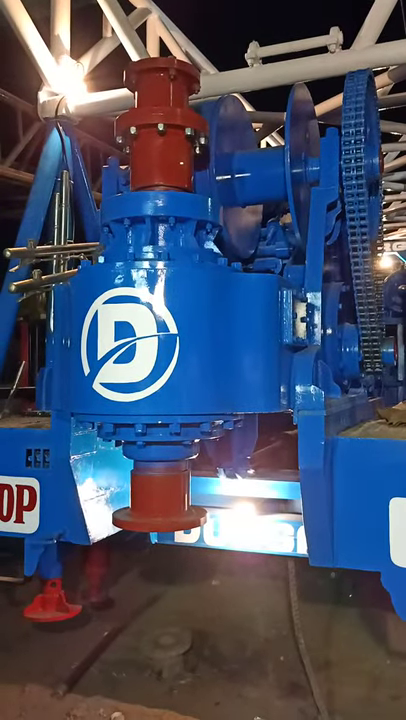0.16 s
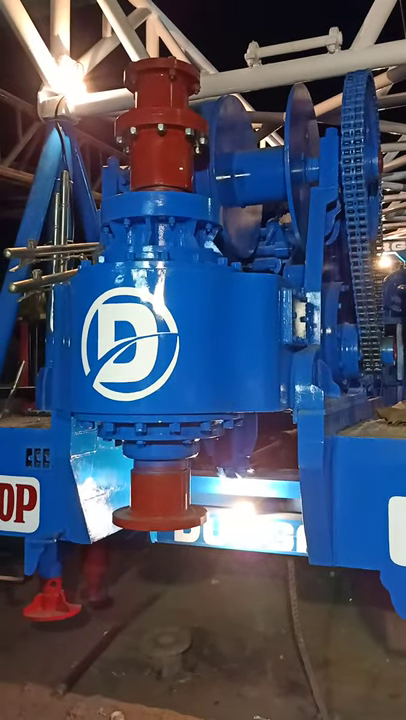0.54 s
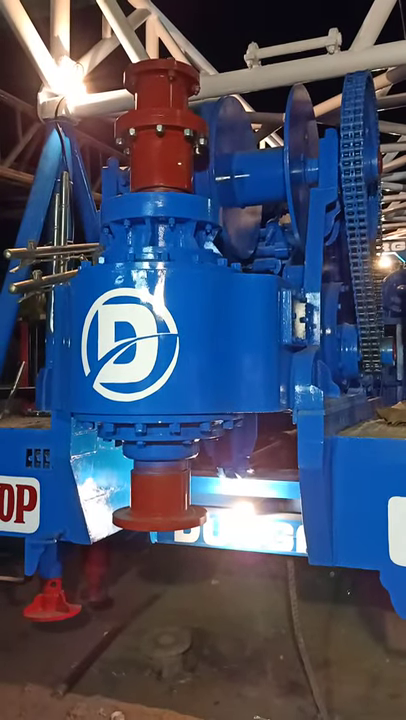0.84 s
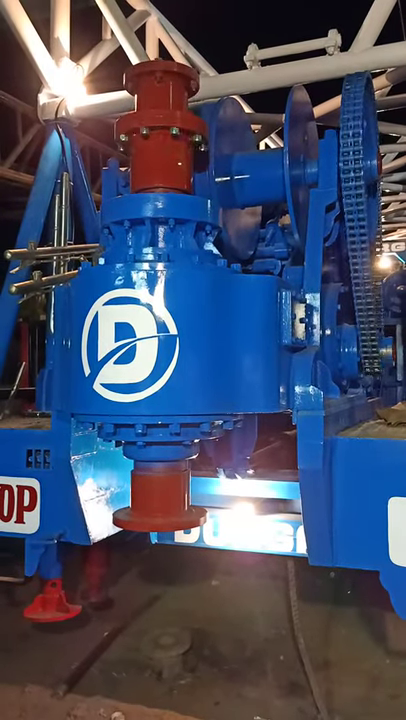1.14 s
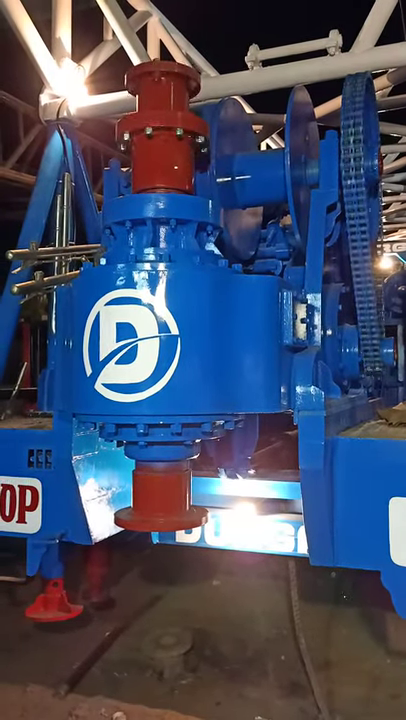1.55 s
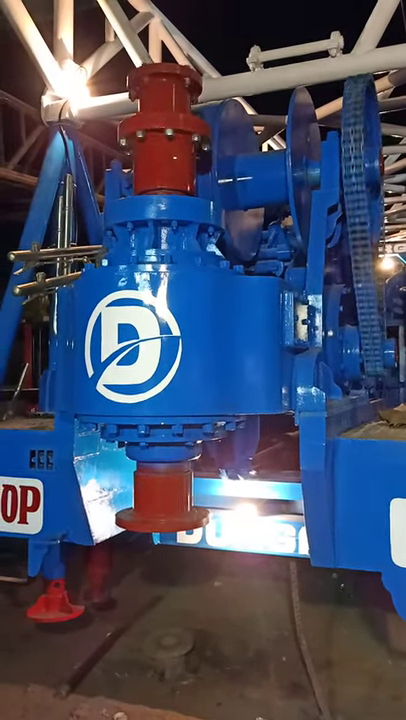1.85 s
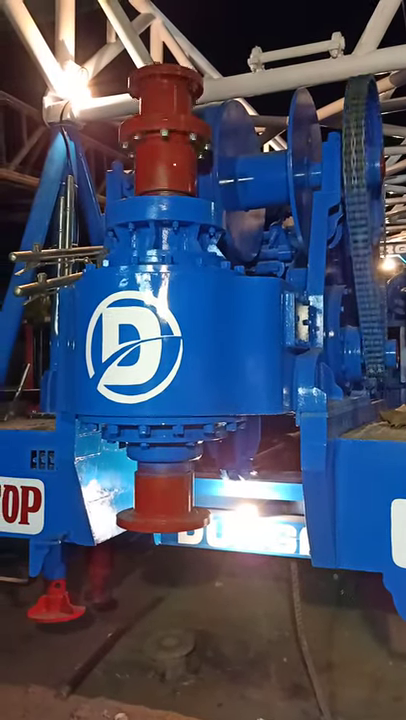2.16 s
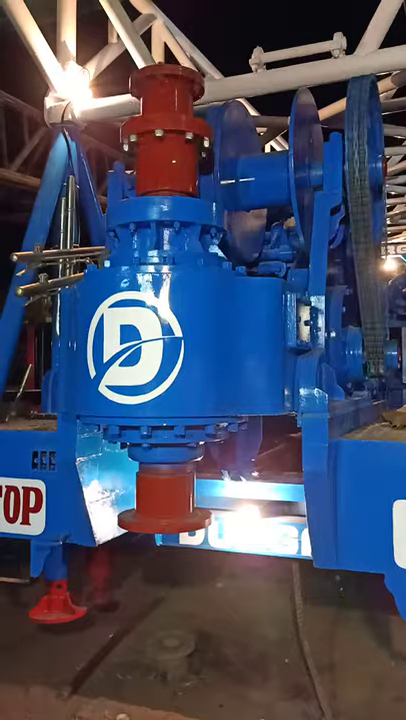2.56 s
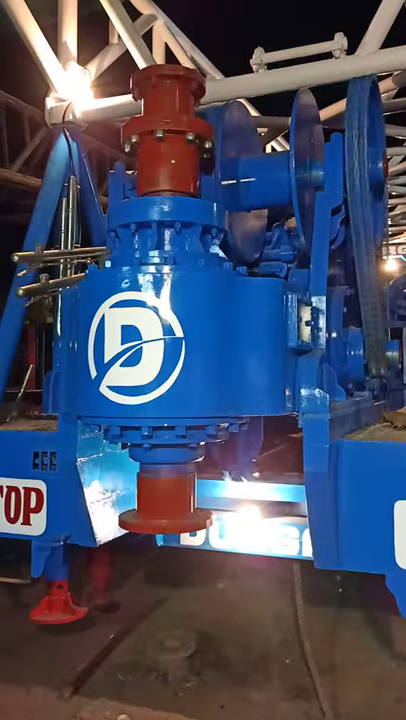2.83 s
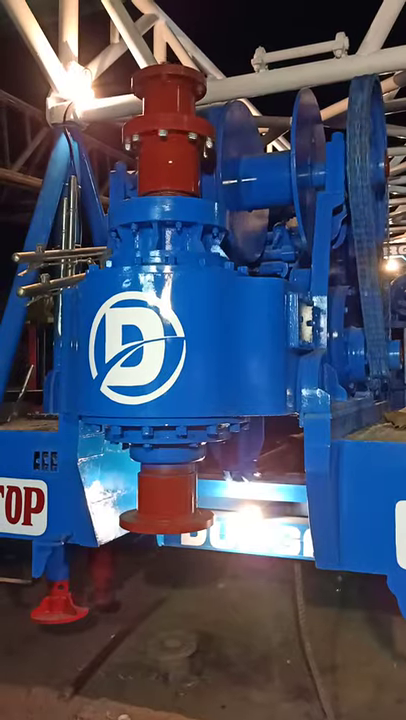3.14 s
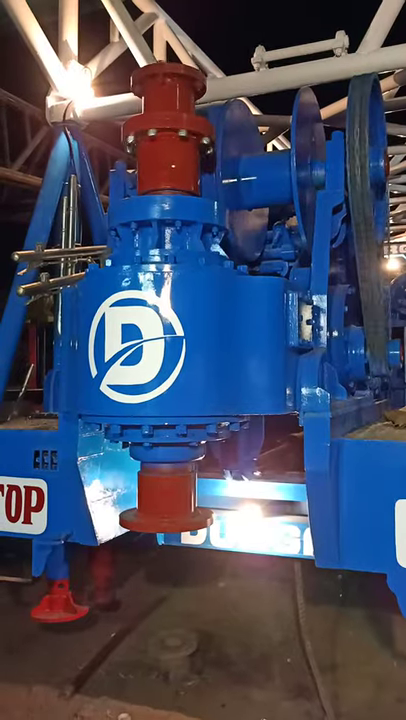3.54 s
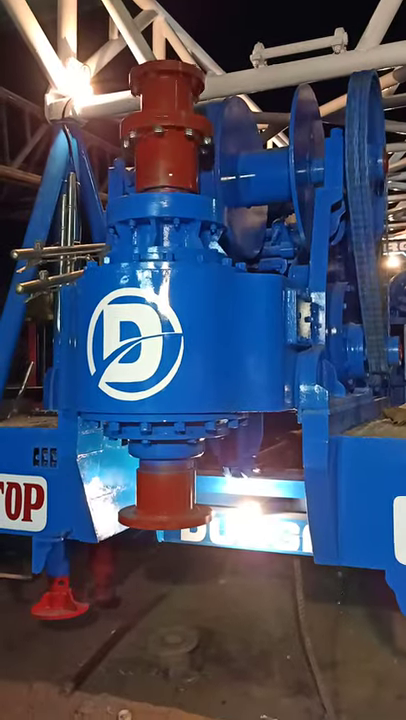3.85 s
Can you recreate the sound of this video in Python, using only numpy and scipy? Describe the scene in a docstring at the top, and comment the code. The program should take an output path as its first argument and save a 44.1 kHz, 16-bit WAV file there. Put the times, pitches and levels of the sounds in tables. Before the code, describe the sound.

A drilling rig heard close in stereo, outdoors. For the first second the engine idles as a low, humming rumble under a soft wash, with faint bright rattles of loose metal. From about 1 s it revs and a chain drive spins up, its rough growl rising in pitch and surging through steel frame resonances over a swelling, knocking roar. It peaks around 3.4 s, then eases slightly, still running at 4 s.

```python
"""A drilling rig heard close by, in stereo. At first the engine idles, as low firing tones under a wash of
shaped noise and wavering hums, while faint noise bursts of loose metal come and go in the treble.
From about 1 s the engine is revved and a chain drive spins up: its link blows, a harmonic series of rising
pitch, ring the resonances of the steel frame, over a growing roar of noise and irregular knocks.
Near the end the engine, chain and roar ease a little."""
import sys
import numpy as np
from scipy import signal
from scipy.fft import rfft, irfft
from scipy.io import wavfile
from scipy.ndimage import uniform_filter1d

SR = 44100
rng = np.random.default_rng(int(sys.argv[2]) if len(sys.argv) > 2 else 0)


def store_pcm(level_fs):
    """Save levels as 16-bit WAV."""
    pcm = np.round(np.clip(level_fs, -1, 1) * 32767).astype(np.int16)
    wavfile.write(sys.argv[1], SR, np.atleast_2d(pcm).T)


N = 176400  # samples: 4 s

# Spectrum of the idling wash. Each row: frequency in Hz, gain in dB.
IDLE_SPECTRUM = [(40, -19), (90, -12), (125, 1.5), (150, -5.5), (230, -2.5), (310, -2), (420, -3),
                 (620, -10), (800, -9), (1250, -8), (1650, -15), (2000, -11.5), (2700, -12.5), (3300, -26),
                 (4000, -31.5), (5500, -33.5), (7200, -34), (8000, -35), (10000, -40.5), (12200, -41.5),
                 (13500, -55), (14300, -42), (15400, -42)]
# Wavering hums of the idling machinery. Each row: frequency in Hz, bandwidth in Hz, level in dB.
IDLE_HUMS = [(148.3, 19, -42), (180.4, 16, -48.5), (318, 16, -48.5)]
IDLE_DB = -33.5  # of the wash

# Bursts of loose metal. Each row: start in seconds, nominal length in seconds, level in dB,
# ring frequency in Hz, left minus right in dB.
RATTLES = [(.085, .03, -61, 9000, 0), (0.179, 0.045, -55, 9000, -2), (.41, 0.047, -59, 9000, 0),
           (0.504, 0.081, -52.5, 9000, 0), (0.667, 0.051, -50.5, 9000, 0), (0.778, 0.057, -60, 9000, 0),
           (0.879, 0.053, -53, 9000, 0), (1.183, 0.042, -54, 9090, -9), (1.494, 0.033, -49.5, 6700, 3),
           (2.29, 0.052, -52, 8900, -3), (2.688, 0.011, -47, 6300, 2), (2.907, 0.0072, -47, 6420, -2),
           (2.938, 0.031, -44.5, 4800, 0), (3.033, 0.0063, -43, 7120, 4), (3.1, 0.023, -48, 6170, 0),
           (3.29, 0.013, -51, 6197, 0), (3.317, .04, -46, 9000, -3), (3.426, 0.017, -48, 6200, 0),
           (3.636, 0.042, -49, 6330, -3), (3.7, 0.023, -56, 5000, 2)]
# Spectrum of the bursts. Each row: frequency in Hz, gain in dB.
RATTLE_SPECTRUM = [(2500, -23), (4000, 4), (6500, 1), (9000, -2), (10500, -4), (12200, -7), (13500, -7),
                   (15500, -3)]
RATTLE_WIDTH_HZ, RATTLE_RING_DB = 1000, -6
HEAVY_HZ, HEAVY_RING_DB = 8000, 7  # parts that ring below this ring more strongly, by this much
RATTLE_RISE, RATTLE_FADE_DB = 0.35, 6  # rise as a share of the length; fade reached at the length
RATTLE_GRAIN_DB, RATTLE_GRAIN_HZ = 2.2, 120  # uneven ticks inside a burst

# Engine firing. Each row: time in seconds, firing frequency in Hz, level in dB.
FIRING = [(0, 49.7, -48), (.64, 50.62, -45.5), (1.15, 48.2, -55.5), (1.5, 50, -49), (2.0, 58.7, -51),
          (2.3, 64.16, -34.5), (2.42, 67.2, -38), (3.1, 68.2, -42.5), (3.5, 66.38, -48), (4, 62.8, -44)]
# Orders of the firing frequency. Each row: multiple, relative level in dB.
FIRING_ORDERS = [(1, -0.5), (2, 0.5), (3, 0), (4, -7), (6, 1)]

# Modes of the steel frame. Each row: frequency in Hz, bandwidth in Hz, gain in dB.
FRAME_MODES = [(133.6, 22, -3), (155, 20, -6), (193.3, 37.6, 0), (230, 57, -4), (248.6, 13, 2.5),
               (324, 49, 8), (360.6, 7.9, 6.5), (424, 32, 3), (470, 3.9, 5), (589.3, 30, 2.5),
               (728, 140, -7), (854, 17, -1), (983, 63, -11.5), (1700, 53, -6), (1855, 45, -2.5),
               (2350, 130, -9)]
FRAME_LOW_HZ = 85  # the frame radiates little below this

# Roar of the running drive. Each row: time in seconds, level in dB, extra level of its treble in dB.
ROAR = [(1.2, -34, 3), (1.4, -33, 2), (1.6, -31, -4), (1.8, -27.5, -8), (2.0, -25.5, -6.5),
        (2.2, -23, -3.5), (2.35, -22.5, -4.5), (2.55, -21.5, -4), (2.75, -21, -6), (2.92, -20, -6),
        (2.97, -19, -4.5), (3.15, -19.5, -4), (3.4, -18.5, -5), (3.55, -20, -5.5), (3.75, -23, -5),
        (4, -23, -5)]
# Spectrum of the roar's noise. Each row: frequency in Hz, gain in dB.
ROAR_SPECTRUM = [(40, -41), (90, -35), (125, -6), (200, -6), (300, -5), (440, -4), (520, -9.5), (600, -7.5),
                 (950, -11.5), (1450, -23), (1900, -21.5), (2400, -20.5), (2850, -26.5), (3400, -35),
                 (4000, -34), (5500, -37.5), (6200, -34), (7500, -38), (9200, -40), (10500, -45.5),
                 (12200, -48), (13500, -55), (14500, -48), (15500, -66)]
DRIVE_START_S, DRIVE_RISE_S = 0.99, 0.53
KNOCKS_PER_S, KNOCKS_DB = 1000, -3  # mean rate in each channel; level relative to the noise
KNOCK_SOFT_HZ = 2600  # blunt knocks hold little above this

# Speed of the chain. Each row: time in seconds, links per second.
CHAIN_SPEED = [(1.4, 42), (1.76, 60), (2.02, 80), (2.13, 85), (2.2, 93), (2.29, 99.5), (2.38, 99.5),
               (2.45, 105.6), (2.66, 116.8), (2.77, 120.4), (2.93, 127.6), (3.1, 135.5), (3.22, 142.5),
               (3.29, 143), (3.46, 149.5), (3.6, 156), (3.79, 153), (4, 149.5)]
# Link blows. Each row: time in seconds, force in dB, extra level of the third harmonic in dB,
# extra level of the harmonics above it in dB.
LINK_FORCE = [(1.4, -37, 3, 4), (1.6, -39.5, 6, 4.5), (1.76, -32.5, 6.5, -3), (1.92, -29, 0.5, -1),
              (2.02, -29, -3, 1.5), (2.13, -21.5, -9, -8), (2.2, -21.5, 0, -10.5), (2.29, -35, 7, 9.5),
              (2.37, -32.5, 8, 6), (2.44, -19, 1.5, -3), (2.51, -35.5, 7.5, 4), (2.56, -29, 1, 3),
              (2.65, -22, -2, -1), (2.77, -21, -1.5, 4.5), (2.85, -21.5, 0, -1), (2.93, -15, -4, -9),
              (2.99, -22, 1, 3), (3.1, -23.5, 1.5, -1.5), (3.2, -19, -18, -11), (3.29, -21.5, 8, 4),
              (3.38, -18.5, -8, -1), (3.46, -17.5, -14, -6), (3.6, -19, -17, -6.5), (3.75, -21, -9, -13.5),
              (3.89, -23.5, -2, -2.5), (4, -21.5, -18, -4)]
# Harmonics of one link's blow. Each row: multiple, level in dB.
BLOW_HARMONICS = [(1, -12), (2, -5.5), (3, -8), (4, -7.5), (5, -8.5), (6, -10)]
WAVER_DB, WAVER_HZ = 1.2, 12
STIFF_DB = -8  # response of the frame away from its modes
# The blows stray from time while the chain runs slow and slack.
SLACK_TURNS, SLACK_HZ, TAUT_LINKS_PER_S = 0.045, 8, 72

TREBLE_HZ = 2920  # centre of the step above which the treble varies by itself
PATCH_DB, SWELL_DB, FLICKER_DB = 1.2, 0.5, 0.7  # rms variations of the noises

# Likeness of left and right. Each row: frequency in Hz, correlation from 0 to 1.
STEREO_LIKENESS = [(60, 0.99), (100, 0.97), (180, 0.98), (320, 0.94), (550, 0.76), (970, 0.19), (1690, 0.0),
                   (2940, 0.026)]
# Stereo balance. Each row: frequency in Hz, left minus right in dB.
STEREO_LEAN = [(60, -1.5), (360, 1.65), (660, -1.6), (1200, 2.5), (2200, 3.5), (4000, 2), (6200, 5),
               (7500, 2), (9000, -7), (11000, -2), (13000, 0.5)]
LOW_CUT_HZ, EDGE_HZ = 35, 15500


def amp(db):
    """Amplitude ratio: twenty decibels are a factor of ten."""
    return 10 ** (np.asarray(db) / 20)


def evened(x):
    """Normalisation to unit rms, so that a later gain sets the level."""
    return x / np.sqrt(np.mean(x ** 2) + 1e-20)


def read_spectrum(points, hz):
    """Interpolation of a spectrum table on a logarithmic frequency axis."""
    f, value = np.transpose(points)
    return np.interp(np.log(hz + 1), np.log(f + 1), value)


def columns(table, t):
    """Linear interpolation in time of each column of a curve table."""
    s, *rest = np.transpose(table)
    return [np.interp(t, s, c) for c in rest]


def wander(cutoff_hz, size=N):
    """Random modulation: low-passed white noise of unit rms."""
    return evened(signal.lfilter(*signal.butter(2, 2 * cutoff_hz / SR), rng.standard_normal(size)))


def coloured(x, points):
    """Spectral shaping: each frequency is weighted by the gain in a table."""
    gain = amp(read_spectrum(points, np.fft.rfftfreq(x.shape[-1], 1 / SR)))
    return irfft(rfft(x) * gain, x.shape[-1])


def ring(x, hz, width):
    """Second-order resonance of unit peak gain, whose bandwidth sets its damping."""
    return signal.lfilter(*signal.iirpeak(hz, hz / width, SR), x)


def stereo_pair(first, second):
    """Partial coherence: left and right share the bass, differ in the treble and lean by frequency."""
    hz = np.fft.rfftfreq(N, 1 / SR)
    same = np.clip(read_spectrum(STEREO_LIKENESS, hz), -1, 1)
    lean = amp(read_spectrum(STEREO_LEAN, hz) / 2)
    a, b = rfft(first), rfft(second)
    left = a * lean
    right = (same * a + np.sqrt(1 - same ** 2) * b) / lean
    return irfft(np.array([left, right]), N)


def hiss(spectrum, treble_db):
    """Two random noises modulated in time and frequency: drifting patches, a slow swell, treble flicker."""
    frames, hz = N // 256 + 9, np.fft.rfftfreq(1024, 1 / SR)
    a, b, c, d, patches = rng.standard_normal((frames, 513, 5)).T
    # the arrays run frequency by frame
    patches = uniform_filter1d(patches, size=10, axis=0)
    patches = evened(uniform_filter1d(patches, size=12, axis=1))
    at = np.minimum(np.arange(frames) * 256, N - 1)
    # a ramp from 0 to 1 over half an octave
    high = np.clip(2 * np.log2((hz + 1) / TREBLE_HZ) + 0.5, 0, 1)[:, None]
    swell_db = SWELL_DB * wander(2.9)[at]
    flicker_db = FLICKER_DB * wander(12)[at]
    field_db = PATCH_DB * patches + swell_db + high * (treble_db[at] + flicker_db)
    cells = np.array([a + 1j * b, c + 1j * d]) * amp(field_db)
    noises = signal.istft(cells, nperseg=1024, noverlap=768)[1][:, :N]
    return evened(coloured(noises, spectrum))


def idle():
    """Broadband machinery noise, with narrow-band noises whose envelopes waver as hums."""
    hums = np.zeros(N)
    for hz, width, db in IDLE_HUMS:
        hums += amp(db) * evened(ring(rng.standard_normal(N), hz, width))
    wash = stereo_pair(*hiss(IDLE_SPECTRUM, np.zeros(N)))
    return amp(IDLE_DB) * wash + hums


def rattles():
    """Transient excitation of loose metal: short bright bursts, each with a resonance of its own."""
    out = np.zeros((2, N))
    for start, length, db, hz, pan_db in RATTLES:
        t = np.arange(0, 2 * length, 1 / SR)
        noise = rng.standard_normal((2, len(t)))
        ring_db = RATTLE_RING_DB + HEAVY_RING_DB * (hz < HEAVY_HZ)
        ringing = amp(ring_db) * evened(ring(noise, hz, RATTLE_WIDTH_HZ))
        sound = evened(coloured(noise, RATTLE_SPECTRUM)) + ringing
        rise = np.minimum(t / (RATTLE_RISE * length), 1)
        fade = amp(db - RATTLE_FADE_DB * (t / length) ** 2)
        grain = amp(RATTLE_GRAIN_DB * wander(RATTLE_GRAIN_HZ, size=len(t)))
        pan = amp([[pan_db / 2], [-pan_db / 2]])
        at = round(start * SR)
        out[:, at:at + len(t)] += sound * rise * fade * grain * pan
    return out


def engine(t):
    """Periodic firing: tones at multiples of the firing frequency, each slightly unsteady in level."""
    hz, level_db = columns(FIRING, t)
    turns = np.cumsum(hz) / SR
    out = np.zeros(N)
    for k, db in FIRING_ORDERS:
        level = amp(level_db + db + 0.5 * wander(3.1))
        out += level * np.sqrt(2) * np.sin(2 * np.pi * k * turns)
    return out


def drive_on(t):
    """Engagement of the drive: a linear rise in amplitude from 0 to 1."""
    return np.clip((t - DRIVE_START_S) / DRIVE_RISE_S, 0, 1)


def roar(t):
    """Random excitation: wide noise of gears and chain, and irregular knocks that ring the frame's modes."""
    level_db, treble_db = columns(ROAR, t)
    struck = rng.random((2, N)) < KNOCKS_PER_S / SR
    knocks = rng.choice([-1., 1.], (2, N)) * struck
    knocks = signal.sosfilt(signal.butter(4, KNOCK_SOFT_HZ, fs=SR, output="sos"), knocks)
    rung = evened(sum(amp(db) * ring(knocks, hz, width) for hz, width, db in FRAME_MODES))
    mix = hiss(ROAR_SPECTRUM, treble_db) + amp(KNOCKS_DB) * rung
    return drive_on(t) * amp(level_db) * stereo_pair(*mix)


def chain(t):
    """Forced vibration by link blows: each harmonic swells while it crosses a mode of the frame."""
    rate, = columns(CHAIN_SPEED, t)
    force_db, third_db, upper_db = columns(LINK_FORCE, t)
    slack = np.minimum(TAUT_LINKS_PER_S / rate, 1.25) ** 4
    # one turn is the passage of one link
    turns = np.cumsum(rate) / SR + SLACK_TURNS * slack * wander(SLACK_HZ)
    quarter_cycle = np.array([[0], [1 / 4]])  # sets the two versions apart
    out = np.zeros((2, N))
    for k, db in BLOW_HARMONICS:
        swell = amp(STIFF_DB)
        for hz, width, gain_db in FRAME_MODES:
            swell = swell + amp(gain_db) / (1 + (2 * (k * rate - hz) / width) ** 2)
        phase = 2 * np.pi * (k * turns + quarter_cycle)
        level_db = db + (k == 3) * third_db + (k > 3) * upper_db + WAVER_DB * wander(WAVER_HZ)
        out += amp(level_db) * swell * np.cos(phase)
    return drive_on(t) * amp(force_db) * np.sqrt(2) * stereo_pair(*out)


def scene():
    """Superposition of the sources, with the bass of the drive cut by the frame's poor radiation."""
    t = np.arange(N) / SR
    radiation = signal.butter(4, FRAME_LOW_HZ, "high", fs=SR, output="sos")
    frame = signal.sosfilt(radiation, roar(t) + chain(t))
    return idle() + rattles() + engine(t) + frame


def record(dry):
    """Band limitation: the microphone drops the deepest bass, then a low-pass removes the top."""
    thin = signal.sosfilt(signal.butter(4, LOW_CUT_HZ, "high", fs=SR, output="sos"), dry)
    low_pass = signal.firwin(511, EDGE_HZ, window=("kaiser", 9), fs=SR)
    return signal.oaconvolve(thin, low_pass[None], "same")


dry = scene()
out = record(dry)
store_pcm(out)
```